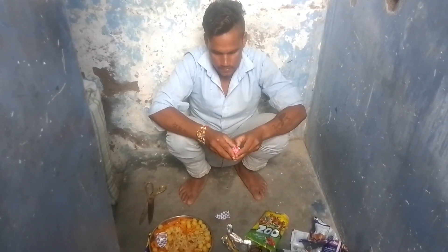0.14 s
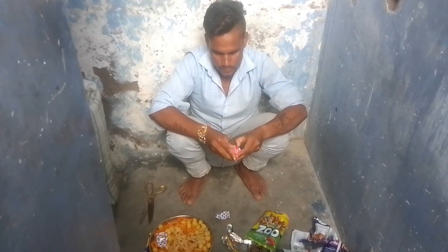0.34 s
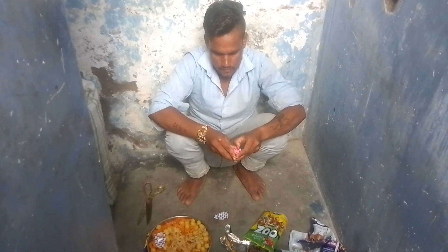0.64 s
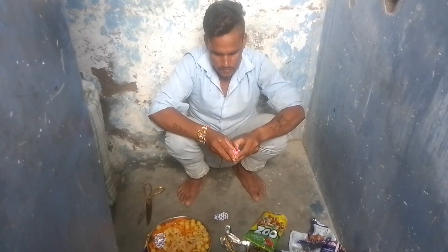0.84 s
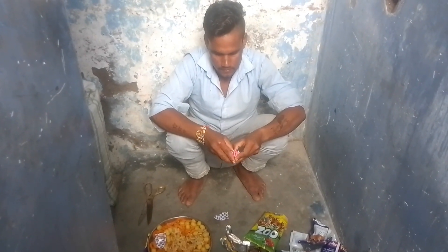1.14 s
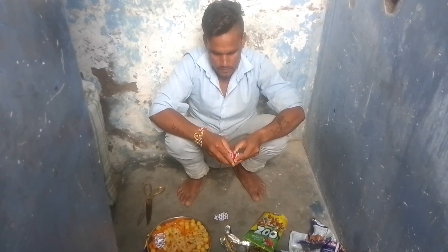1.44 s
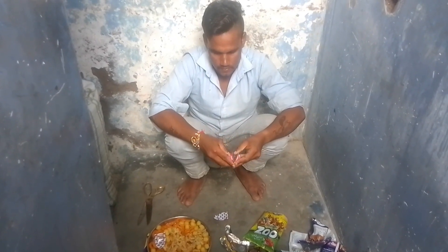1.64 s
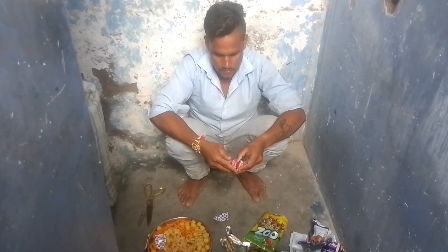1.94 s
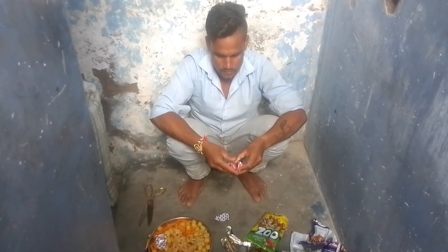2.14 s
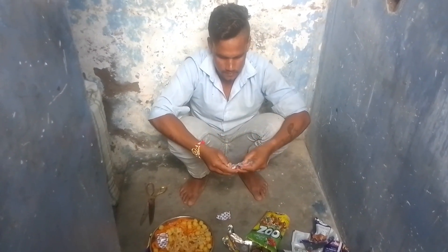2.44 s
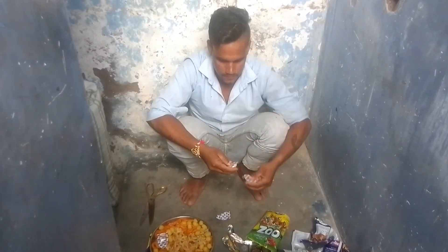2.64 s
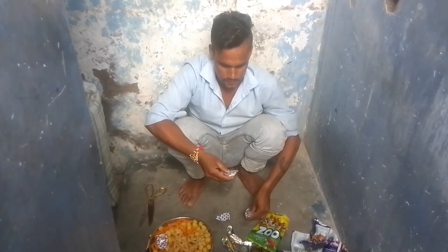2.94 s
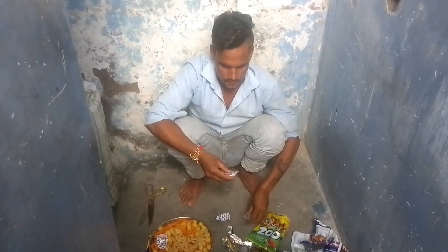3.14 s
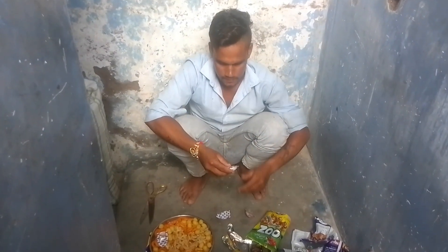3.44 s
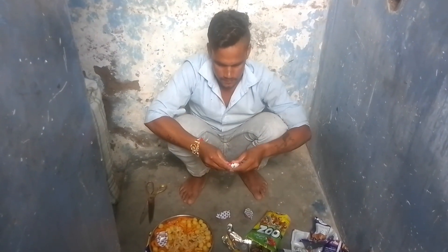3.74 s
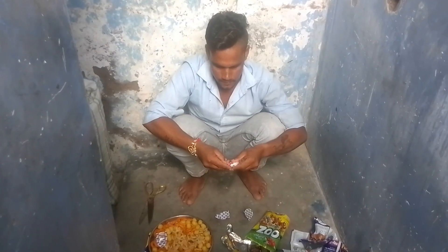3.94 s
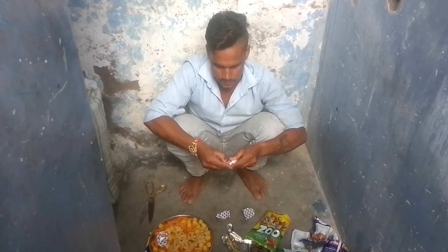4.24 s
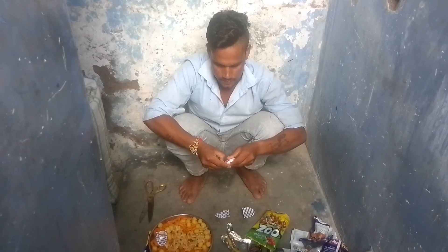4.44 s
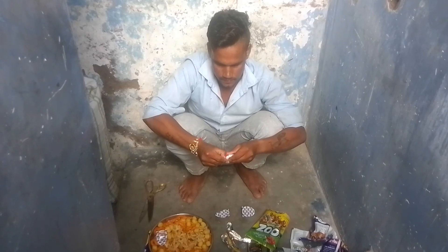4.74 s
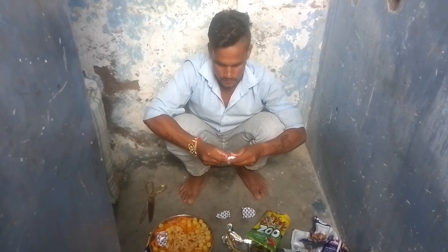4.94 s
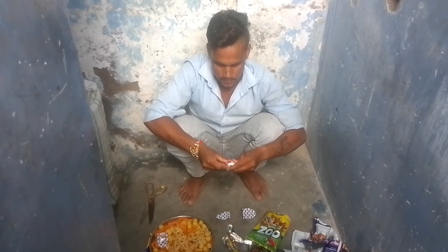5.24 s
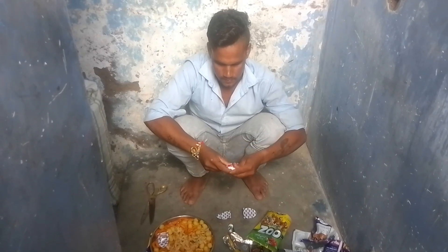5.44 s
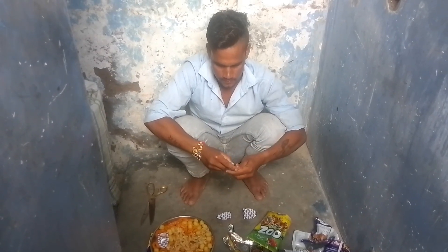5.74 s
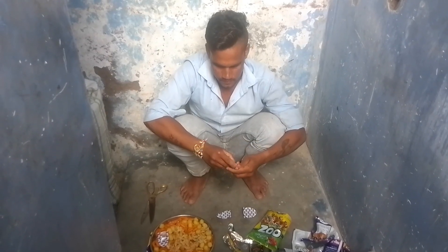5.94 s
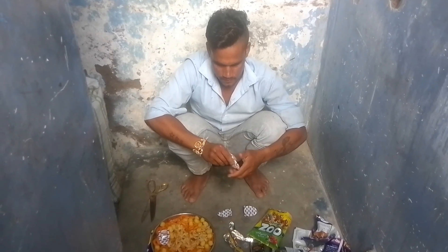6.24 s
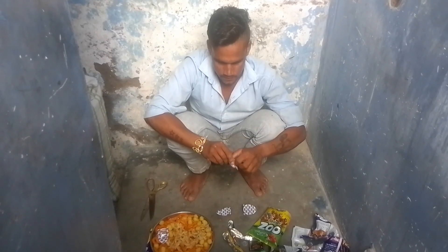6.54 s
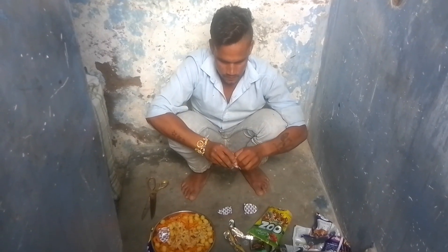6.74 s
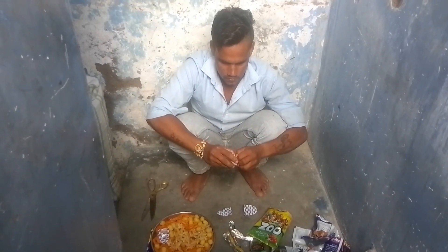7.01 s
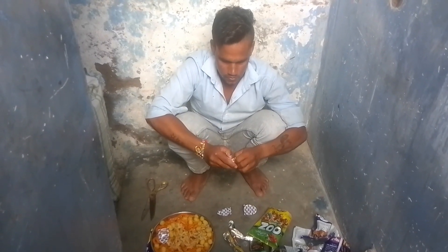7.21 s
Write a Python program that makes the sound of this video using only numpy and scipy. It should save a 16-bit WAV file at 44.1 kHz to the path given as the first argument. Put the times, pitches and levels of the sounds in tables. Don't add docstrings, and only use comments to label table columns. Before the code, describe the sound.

Fingers crinkle a small plastic wrapper in a bare concrete room: sharp irregular snaps and short tears, little squeaks, quiet gaps, faint street hum.

```python
import sys
import numpy as np
from scipy import signal
from scipy.fft import rfft, irfft, next_fast_len
from scipy.io import wavfile

SR = 44100
rng = np.random.default_rng(int(sys.argv[2]) if len(sys.argv) > 2 else 0)


def wav_out(sig):
    wavfile.write(sys.argv[1], SR, np.round(np.clip(np.atleast_2d(sig).T, -1, 1) * 32767).astype(np.int16))


def nominal_scale(level):
    x = np.asarray(level, float) / 20
    return 10 ** x


N = 325007
FLUTTER_HZ = 57


def at_hz(points, hz):
    points = np.array(points)
    return np.interp(np.log(hz), np.log(points[:, 0]), points[:, 1])


def rms_one(x):
    return x / np.sqrt(np.mean(x ** 2) + 1e-20)


def band(x, low_hz, high_hz):
    return signal.sosfilt(signal.butter(2, [low_hz, high_hz], "band", fs=SR, output="sos"), x)


def resonate(x, hz, width_hz):
    r = np.exp(-np.pi * width_hz / SR)
    zeros = np.array([1, 0, -1]) * (1 - r * r) / 2
    return signal.lfilter(zeros, [1, -2 * r * np.cos(2 * np.pi * hz / SR), r * r], x)


def coloured(x, spectrum):
    size = next_fast_len(len(x))
    hz = np.maximum(np.fft.rfftfreq(size, 1 / SR), 1)
    return irfft(rfft(x, size) * nominal_scale(at_hz(spectrum, hz)), size)[:len(x)]


def drift(rate_hz):
    r = np.exp(-2 * np.pi * rate_hz / SR)
    slow = signal.lfilter([1], [1, -2 * r, r * r], rng.standard_normal(N + SR))
    return rms_one(slow[SR:])


def add(track, s, piece):
    i = int(s * SR)
    track[i:i + len(piece)] += piece[:N - i]


def bursts(lengths_s, per_s, spread_db, first_db):
    t = np.arange(6000) / SR
    draw = rng.random((len(lengths_s), 3, len(t)))
    occurs = draw[:, 0] < per_s / SR
    slips = occurs * nominal_scale(-spread_db * np.log(draw[:, 1] + 0.0042)) * np.sign(draw[:, 2] - .5)
    slips = slips * np.exp(-(t / np.clip(lengths_s, 1e-4, .11)[:, None]) ** 4)
    slips[:, 0] = nominal_scale(first_db)
    return slips / np.sqrt(np.sum(slips ** 2, axis=1, keepdims=True))


def snaps():
    # (time [s], peak [dB], then thump, body and edge [dB re peak])
    creases = [(0.2393, -29.5, -30, -39, -11), (0.344, -21.5, -32.5, -28.5, -5.5),
               (1.0435, -19.5, -21.5, -26, -9.5), (1.3677, -17.5, -13.5, -12, -5.5),
               (1.433, -8, -23, -21, -4.5), (1.6665, -21.5, -44, -16.5, -0.5), (1.792, -26, -41, -2, 1),
               (1.885, -39, -35, -10, 9), (1.9792, -27.5, -39, -7.5, -10),
               (2.018, -20.5, -33.5, -15.5, -18.5), (2.4694, -21, -32, -15.5, -2.5),
               (3.1322, -39.5, -36.5, -25, 2), (3.243, -31.5, -23.5, -17, 5),
               (3.8443, -35, -18.5, -14, -5.5), (4.7925, -5.5, -29.5, -16.5, -12.5),
               (4.841, -14, -17, -12, -4.5), (5.1256, -38.5, -48, -3, -13),
               (5.5413, -30.5, -31.5, -1, -3.5), (6.316, -47.5, -31, -7, 1), (6.7136, -38, -19, -15, -14),
               (7.0576, -9.5, -25, -6.5, 0.5), (7.0735, -31.5, -44, 15, 1), (7.203, -28, -21, -12.5, -7),
               (7.2164, -22, -20.5, -13, -4.5)]
    # (time [s], peak [dB], body and edge [dB re peak])
    crackles = [(0.8476, -57.5, -8, -5), (1.645, -37.5, -29, -5), (2.2833, -63.5, 1, 4),
                (2.4615, -46, -4, 14.5), (2.828, -59.5, 2.5, -11), (3.1103, -49, -9, -1),
                (3.5714, -60, -7, -3), (3.7382, -58.5, -3, -5.5), (5.202, -61.5, 19.5, 2),
                (5.4375, -69, -7, -4), (5.8656, -56, 9, -1), (5.9357, -50, 4.5, -6), (6.0482, -62, 3, -6),
                (6.179, -53, -4, -10), (6.66, -56.5, -7, -9), (6.8112, -51, 3.5, -6),
                (6.842, -45, -23, 8.5), (7.05, -38.5, 0, 1)]
    crackle_thump_db, top_re_edge_db = -20, -3.5
    rows = creases + [(s, db, crackle_thump_db, body, edge) for s, db, body, edge in crackles]
    s, db, thump, body, edge = np.transpose(rows)
    slips = bursts(np.full(len(s), .003), per_s=2500, spread_db=2.0, first_db=20)
    top = db + edge + top_re_edge_db + top_db(s)
    return through_film(s, slips, np.c_[db + thump, db + body, db - 12.0, db + edge, top])


def tears():
    # (time [s], peak [dB], body and edge [dB re peak], length [s])
    rips = [(0.2355, -49, -2.5, -26, 0.041), (0.34, -28.5, -27, -0.5, 0.065),
            (1.0436, -16.5, -16, -4, 0.058), (1.365, -13.5, -16, -1.5, 0.052), (1.663, -34, -14.5, 0, 0.14),
            (1.79, -48, -27, -13, 0.021), (1.9729, -39, -4.5, 6.5, 0.073), (2.011, -37, 2.5, -31, 0.019),
            (2.468, -21, -12.5, -3, 0.062), (3.136, -38.5, -9.5, -1, 0.16), (3.24, -37.5, -8, 2, 0.032),
            (3.8495, -47.5, -9.5, 4.5, 0.022), (4.7932, -15.5, -13, -1.5, 0.067),
            (5.1204, -33, -11, -36, 0.0071), (5.5384, -30, -16, -7.5, 0.075), (6.314, -51.5, -11, 8, 0.032),
            (6.709, -47, -1.5, -15, 0.046), (6.8417, -66, 18, 17, 0.12), (7.058, -11, -16.5, 2, 0.055),
            (7.2085, -34, -7.5, -14, 0.094)]
    top_re_edge_db = -6.5
    s, db, body, edge, length = np.transpose(rips)
    slips = bursts(length, per_s=5000, spread_db=4.0, first_db=3.0)
    top = db + edge + top_re_edge_db + top_db(s)
    return through_film(s, slips, np.c_[db + body - 9.0, db + body, db - 10.0, db + edge, top])


def through_film(times, slips, band_db):
    # (frequency [Hz], density [dB per Hz])
    film_colour = [(120, -55.5), (200, -27.5), (322, -34), (509, -19.5), (635, -27), (968, -17.5),
                   (1100, -14.5), (1870, 7.5), (2750, 4.5), (3130, 0.5), (3970, 2), (6400, -6),
                   (7410, -6.5), (13800, -5), (16000, -23)]
    colour_hz = [800, 2100, 4500, 8000, 13000]
    band_width_hz = [800, 1900, 2800, 4500, 5000]
    mottle_db, mottle_hz = 2.5, np.geomspace(500, 16000, 22)
    out = np.zeros(N)
    hz = np.maximum(np.fft.rfftfreq(8192, 1 / SR), 1)
    width_db = 10 * np.log10(np.array(band_width_hz) * 2 / SR)
    tilts = band_db - width_db - at_hz(film_colour, colour_hz)
    mottle = mottle_db * rng.standard_normal((len(times), len(mottle_hz)))
    for s, piece, tilt, patches in zip(times, slips, tilts, mottle):
        gain_db = at_hz(film_colour, hz) + at_hz(np.c_[colour_hz, tilt], hz)
        gain_db = gain_db + at_hz(np.c_[mottle_hz, patches], hz) + hollows(s, hz)
        shaped = irfft(rfft(piece, 8192) * nominal_scale(gain_db))
        add(out, s - 200 / SR, np.roll(shaped, 256))
    return out


def hollows(s, hz):
    # (time [s], palm, knuckle and finger hollows [dB])
    grip = [(.24, 6.5, -6, -1.5), (.34, -1, -4, 0.6), (1.045, 1.5, -0.5, -5), (1.367, -8.5, -6.5, 1),
            (1.433, -1.5, -2.5, 3), (1.67, -20, 4.5, 0), (1.79, -5, 0.5, -5), (1.98, -12.5, 2.5, -0.5),
            (2.47, -8.5, 1, 1.5), (3.13, 2, 0.2, 0), (3.24, -22, 2, -4), (3.85, -16.5, -2, -3),
            (4.79, -4, -4, -2), (4.84, -11, 1, 2), (5.12, -0.8, -5.5, -1.2), (5.54, -9, 0, -2),
            (6.31, 9, -6, 0.5), (6.71, 4.5, -7, -0.5), (7.058, -11, -7, -4.5), (7.21, -9, -5, 1)]
    # (time [s], lower, middle and upper sheen [dB])
    facing = [(.24, 0.5, -2, 1), (.34, -4, -4.5, 2), (1.045, 2.5, -0.1, 0.5), (1.367, -0.5, 0.7, 2),
              (1.433, -0.5, 0.3, -5), (1.67, 0, 0.5, -2.5), (1.79, -0.7, -3.5, -1), (1.885, 2.5, -4.5, 0),
              (1.98, 2.5, 4, 4.5), (2.47, 3, 0.3, -1), (3.13, 0, -1.5, 0.1), (3.24, 0.5, -3.5, -1.8),
              (3.85, 0.5, 1, -0.2), (4.79, 1, -0.5, -1), (5.12, -1, -3, 3), (5.54, -0.3, -0.5, 1),
              (6.31, -2.5, -4, -3.5), (6.71, 0, -1.8, 1), (6.84, 0, -3, 1), (7.058, 2.3, 0.5, -2.5),
              (7.21, 3, 1.5, 1.5)]
    hollow_hz = [580, 1200, 3400]
    sheen_hz = [5000, 7900, 12500]
    width_octaves = 0.2
    colour = 0
    for rows, centres in (grip, hollow_hz), (facing, sheen_hz):
        times, *depths = np.transpose(rows)
        for db, centre in zip(depths, centres):
            bump = np.exp(-.5 * (np.log2(hz / centre) / width_octaves) ** 2)
            colour = colour + np.interp(s, times, db) * bump
    return colour


def top_db(s):
    # (time [s], gain of the very top [dB])
    taut = [(0.3, -13.5), (1.05, -1), (1.45, -4), (1.7, 0.5), (2.5, -1.5), (3.2, -17), (3.85, -2.5),
            (4.8, -3), (5.12, -4), (5.54, -9.5), (6.3, -6.5), (6.71, -8.5), (6.84, -13), (7.04, -2),
            (7.2, -1)]
    return np.interp(s, *np.transpose(taut))


def creaks():
    # (time [s], peak [dB], pitch [Hz], width [Hz])
    folds = [(0.057, -42.5, 1970, 301), (0.2456, -38, 1080, 200), (0.345, -43, 980, 200),
             (1.4335, -18, 1150, 251), (1.6842, -20, 1850, 300), (1.7986, -19.5, 2290, 300),
             (2.16, -40, 1740, 300), (2.175, -36, 1490, 300), (2.285, -39, 1844, 400),
             (2.6338, -22.5, 1940, 149.4), (2.6694, -35, 2000, 200), (2.82, -40, 1965, 300),
             (3.17, -34, 2700, 200), (3.242, -27.5, 2325, 150), (3.2902, -32, 1860, 120),
             (5.128, -34.5, 2120, 301), (5.18, -35, 2345, 300), (5.575, -22, 2006, 250),
             (5.8662, -33, 2280, 200), (5.8665, -30, 1780, 200), (5.9369, -38, 2400, 120),
             (5.945, -27.5, 1800, 171), (6.167, -44, 1830, 300), (6.676, -39, 2270, 300),
             (6.752, -21, 1880, 250), (6.766, -29, 2190, 300), (6.8185, -47, 1860, 300),
             (6.8994, -53, 1940, 300), (6.9845, -48, 2010, 300), (7.2194, -23, 2120, 300)]
    # (time [s], peak [dB], pitch [Hz], burst length [s])
    ticks = [(0.237, -53, 6900, .002), (.344, -44, 5840, .002), (.345, -38, 1100, 0.0087),
             (0.351, -27.5, 2510, 0.025), (1.05, -26.5, 273, 0.0016), (1.432, -30, 4400, .002),
             (1.434, -8, 10100, 0.0016), (1.434, -8, 1190, 0.0034), (1.433, -45, 120, 0.0043),
             (1.793, -17, 5180, .0023), (2.637, -27, 1980, 0.0041), (3.138, -31, 3400, 0.044),
             (3.843, -37, 5520, .0016), (4.791, -6.5, 4420, 0.042), (4.794, -31.5, 200, 0.005),
             (5.122, -26.5, 7180, 0.0019), (5.123, -44, 4500, .005), (5.201, -37, 9600, .002),
             (6.316, -30.5, 5890, 0.0037), (6.317, -27, 8770, 0.0039), (6.714, -43, 4700, 0.0037),
             (6.75, -23.5, 2490, 0.0059), (6.761, -28.5, 2840, 0.013), (6.812, -36, 9200, .002),
             (7.215, -24, 980, 0.0023)]
    creak_s, tick_width_hz, tick_damping = 0.014, 340, 0.057
    floor, ceiling = .78, 1.4
    rows = [(s, db, hz, width_hz, creak_s) for s, db, hz, width_hz in folds]
    rows += [(s, db, hz, tick_width_hz + tick_damping * hz, length) for s, db, hz, length in ticks]
    rows = np.array(rows)
    out = np.zeros(N)
    slips = bursts(rows[:, 4], per_s=780, spread_db=2.5, first_db=8.0)
    for (s, db, hz, width_hz, _), piece in zip(rows, slips):
        rung = resonate(resonate(piece, hz, 2 * width_hz), hz, width_hz)
        rung = signal.sosfilt(signal.butter(4, floor * hz, "high", fs=SR, output="sos"), rung)
        rung = signal.sosfilt(signal.butter(4, ceiling * hz, fs=SR, output="sos"), rung)
        add(out, s, nominal_scale(db - 18.5) * rung / np.linalg.norm(rung))
    return out


def pops():
    # (time [s], peak [dB], pitch [Hz], T60 [s])
    facets = [(1.4338, -17.5, 1085.5, 0.091), (1.4342, -22.5, 1500, 0.12), (1.4345, -14.5, 4800, 0.033),
              (1.046, -27.5, 1950, .04), (1.44, -21, 1050, 0.064), (1.442, -14, 3944, 0.036),
              (1.455, -21, 1250, 0.045), (1.052, -24, 4200, 0.023), (1.066, -19, 4300, 0.017),
              (1.083, -21, 4400, .012), (4.7935, -13, 5900, .012), (4.826, -16.5, 3910, 0.024),
              (4.829, -18, 1650, 0.047), (4.811, -22.5, 1400, .06), (4.836, -23.5, 1850, .04),
              (4.844, -28, 720, 0.05), (5.4, -45, 200, .06), (4.841, -11, 7210, .015),
              (7.0752, -17, 2021, 0.038), (7.097, -10.5, 1973, 0.054), (7.2175, -20, 5040, .012),
              (7.22, -30, 980, 0.085), (2.633, -31, 1930, 0.11), (2.286, -46, 1800, 0.044),
              (.346, -36, 1060, .05), (6.5, -34, 9600, 0.022), (5.123, -37, 7200, .03),
              (5.124, -43, 2850, .03), (4.793, -21, 4100, .02), (6.842, -38, 8800, .02),
              (3.306, -40, 2100, 0.044), (4.812, -25, 3000, .015), (4.843, -21, 4400, .015),
              (1.798, -28, 1800, 0.045), (2.488, -28.5, 1850, 0.034), (1.433, -47.5, 110, .05),
              (1.434, -45, 500, .03), (4.8, -60, 190, .09), (4.845, -53, 130, .09),
              (7.078, -17, 2800, 0.043), (7.11, -22, 3100, .04)]
    out, t = np.zeros(N), np.arange(4096) / SR
    for s, db, hz, t60 in facets:
        onset = np.minimum(t * hz / 2, 1)
        add(out, s, nominal_scale(db - 60 * t / t60) * np.sin(2 * np.pi * hz * t) * onset)
    return out


def squeaks():
    # (start [s], length [s], pitch [Hz], width [Hz], level [dB])
    rings = [(.24, .15, 1080, 90, -54), (.24, .25, 2600, 120, -55), (.344, .3, 1060, 90, -50),
             (.344, .3, 2100, 110, -48), (.344, .25, 2600, 120, -52), (.71, .16, 7900, 300, -68),
             (1.45, .3, 1220, 160, -36), (1.55, .15, 1000, 60, -52), (1.05, .1, 8100, 700, -31),
             (5.545, .22, 1250, 200, -49), (5.59, .12, 2100, 90, -47), (5.93, .22, 1720, 110, -51),
             (3.14, .18, 3380, 180, -51), (1.046, .16, 2150, 300, -39), (1.046, .13, 1250, 200, -45),
             (1.05, .14, 500, 150, -51), (1.368, .07, 400, 100, -49), (1.368, .06, 800, 100, -48),
             (3.245, .2, 2900, 150, -54), (3.243, .1, 2380, 110, -46), (4.85, .14, 850, 120, -47),
             (6.71, .15, 9400, 300, -62), (2.6, .25, 9250, 100, -72), (2.631, .1, 1940, 130, -40),
             (6.75, .12, 2400, 700, -43), (2.74, .2, 1950, 250, -57), (2.17, .22, 1550, 250, -55),
             (6.84, .2, 4800, 1200, -57), (3.846, .4, 2860, 60, -54), (3.846, .25, 2500, 250, -52),
             (5.123, .36, 2860, 80, -46), (5.123, .26, 2300, 200, -48), (5.54, .32, 2830, 90, -45),
             (3.27, .23, 1830, 80, -48), (6.314, .15, 5900, 200, -54), (6.314, .16, 8700, 200, -54),
             (5.865, .3, 2400, 90, -52), (6.84, .25, 9250, 120, -54)]
    # (start [s], length [s], pitch [Hz], width [Hz],
    # level [dB])
    rubs = [(.5, .5, 10350, 150, -79), (1.2, .17, 480, 100, -59), (1.2, .16, 830, 50, -64),
            (2.21, .07, 2450, 160, -63), (2.25, .13, 1800, 600, -60), (6.95, .1, 810, 50, -64),
            (1.16, .21, 7820, 50, -60), (1.17, .2, 10400, 50, -59), (1.2, .18, 2100, 300, -55),
            (1.2, .18, 1200, 500, -61), (2.31, .2, 10900, 45, -49), (2.35, .14, 11950, 110, -58),
            (2.37, .09, 5670, 110, -69), (4.2, .5, 3120, 40, -82)]
    noise, out = rng.standard_normal(N), np.zeros(N)
    # small peaks early, 1 in the middle; rings also fade [dB] and throb with the echoes
    for rows, swell, fade_db, throb in (rings, .22, 15, .45), (rubs, .9, 0, 0):
        for start, length, hz, width_hz, db in rows:
            phase = np.arange(int(length * SR)) / (length * SR)
            rubbing = noise[int(start * SR):][:SR // 2]
            rung = resonate(resonate(rubbing, hz, 2 * width_hz), hz, width_hz)
            shape = np.sin(np.pi * phase ** swell) * nominal_scale(db - fade_db * phase)
            shape = shape * (1 + throb * np.cos(2 * np.pi * FLUTTER_HZ * length * phase))
            add(out, start, shape * rms_one(rung)[-len(phase):])
    return out


def room(x):
    # (frequency [Hz], T60 [s])
    room_t60 = [(300, 0.42), (1000, 0.48), (2500, 0.38), (5000, 0.28), (9000, 0.3), (15000, 0.22)]
    late_db, late_stretch = -29.5, 2.7
    hold_s, first_echo_s, flutter_depth = 0.0019, 0.006, 0.22
    direct_db, direct_s, sheen = 8.5, 0.0025, .04
    t = np.arange(int(.9 * SR)) / SR
    aged = np.sqrt(t ** 2 + hold_s ** 2) - hold_s
    edges = np.geomspace(120, 19500, 16)
    white, tail = rng.standard_normal((2, len(t))), 0
    for k, (low, high) in enumerate(zip(edges, edges[1:])):
        fall_db = -60 * aged / at_hz(room_t60, np.sqrt(low * high))
        decay = nominal_scale(fall_db) + nominal_scale(late_db + fall_db / late_stretch)
        tail = tail + band(white[k % 2], low, high) * decay
    tail = tail * np.clip(t / first_echo_s, 0, 1)
    tail = tail * (1 + flutter_depth * np.cos(2 * np.pi * FLUTTER_HZ * t))
    smear = rfft(white[0, :512] * np.exp(-(t[:512] / direct_s) ** 2))
    size = np.abs(smear)
    direct = signal.lfilter([1, -sheen], 1, irfft(smear / size ** .8)) / np.mean(size) ** .2
    tail[:512] += nominal_scale(direct_db + 15.0) * direct
    return signal.fftconvolve(x, tail)[:N]


def through_modes(modes):
    noise, total = rng.standard_normal(N), 0
    for k, (hz, width_hz, db) in enumerate(modes):
        rung = resonate(resonate(noise, hz, 3 * width_hz), hz, width_hz)
        total = total + (-1) ** k * nominal_scale(db) * rms_one(rung)
    return rms_one(total)


def street():
    # (frequency [Hz], width [Hz], level [dB])
    cross_modes = [(50.5, 12, -6), (182.4, 6.3, -4), (244, 13, -7), (308, 37, -0.5), (397, 42, 4.5),
                   (528, 120, 3.5), (817.5, 22, -2), (800, 10, -4), (398.3, 7.3, -4.5), (1010, 86, -2)]
    # (frequency [Hz], width [Hz], level [dB])
    thud_modes = [(171, 23, -8), (382, 42, 1.5), (543, 82, -12.5), (785, 60, -12), (980, 50, -13)]
    # (time [s], level [dB])
    thud_level = [
        (7.27, -67),
        (7.28, -88),
        (7.318, -41),
        (7.352, -38),
        (7.37, -32.5),
    ]
    # (time [s], level [dB])
    traffic = [(0, 1), (.9, 0.5), (1.3, 2.5), (2.4, 1), (3.0, 1), (3.6, -2), (4.6, -1), (5.3, 1),
               (6.4, 0.5), (7.37, -0.5)]
    t = np.arange(N) / SR
    thud = nominal_scale(np.interp(t, *np.transpose(thud_level), left=-120)) * through_modes(thud_modes)
    hum_db = -63 + np.interp(t, *np.transpose(traffic)) + .5 * drift(2.7)
    return nominal_scale(hum_db) * through_modes(cross_modes) + thud


def hiss():
    # (frequency [Hz], density [dB per Hz])
    floor_colour = [(12, -29.5), (20, 5), (60, -12.5), (81, -29), (120, -4), (150, -15.5), (172, -1.5),
                    (399, -14.5), (607, -22.5), (780, -10.5), (1370, -13), (3070, -15.5), (3740, -21.5),
                    (9400, -22.5), (16000, -39)]
    # (frequency [Hz], density [dB per Hz])
    air_colour = [(1760, -31.5), (3000, -7), (3240, -10.5), (3700, -9), (5650, -9), (6540, -8.5),
                  (7880, -9), (8510, -8.5), (9580, -0.5), (11000, -11), (14300, -14), (15800, -26.5)]
    # (time [s], level of the upper hiss [dB])
    rustle = [(0, -68), (.5, -71), (1.3, -64.5), (2.301, -68.5), (2.7, -62), (3.0, -65.5), (3.501, -73.5),
              (3.62, -63.5), (3.8, -66), (4.05, -71.5), (4.78, -71), (5.1, -72), (5.8, -66), (6.28, -65),
              (6.5, -74.5), (6.751, -59), (6.999, -65.5), (7.37, -54)]
    # (frequency [Hz], width [Hz], level [dB])
    whine_modes = [(7810, 60, -6), (8180, 90, -7), (8530, 60, -7), (8890, 50, -4), (9230, 55, 0),
                   (9570, 50, -1), (9960, 70, -3), (10300, 90, -5)]
    low = band(rms_one(coloured(rng.standard_normal(N), floor_colour)), 10, 3300)
    rustle_db = np.interp(np.arange(N) / SR, *np.transpose(rustle))
    air = nominal_scale(rustle_db) * rms_one(coloured(rng.standard_normal(N), air_colour))
    whine = nominal_scale(-75 + 1.5 * drift(1.5)) * through_modes(whine_modes)
    return nominal_scale(-61.5 - 1.5 + 0.56 * drift(2.3)) * low + air + whine


def scene():
    film = band(band(snaps() + tears(), 420.0, 20000), 300.0, 16000) + creaks()
    return (room(film) + pops() + squeaks() + street() + hiss())[None]


def roll_off(x):
    return signal.sosfilt(signal.butter(12, 16790, fs=SR, output="sos"), x)


def record(dry):
    linear = dry * 0.665
    rounded = 0.88 * np.tanh(dry / 1.323)
    heard = linear + band(rounded - linear, 700, 20000)
    top_hz, leak_db = 15680, -26
    edge = [(11000, 0), (13300, -2), (15200, 4), (top_hz, 4), (top_hz + 120, leak_db)]
    return roll_off(coloured(heard[0], edge)[None])


dry = scene()
out = record(dry)
wav_out(out)
```